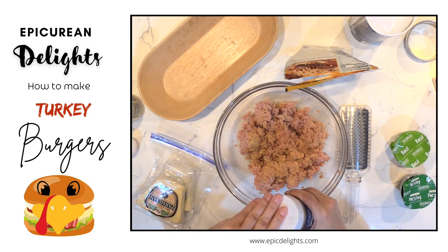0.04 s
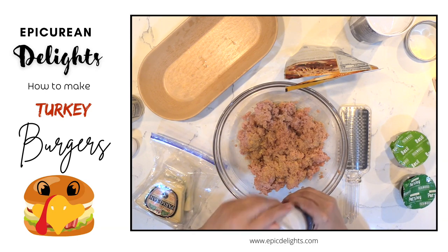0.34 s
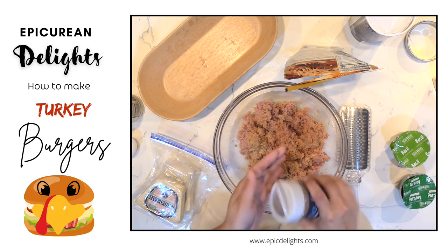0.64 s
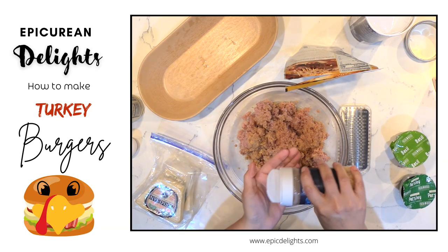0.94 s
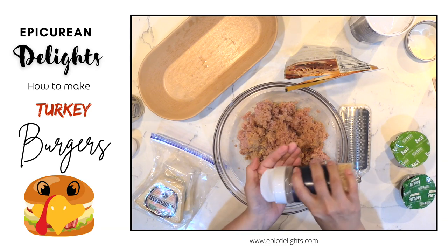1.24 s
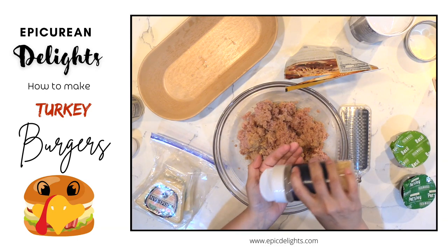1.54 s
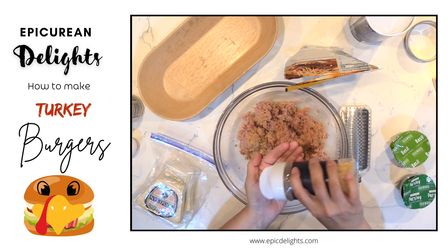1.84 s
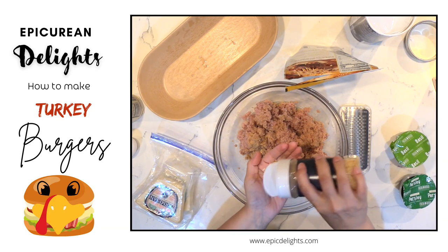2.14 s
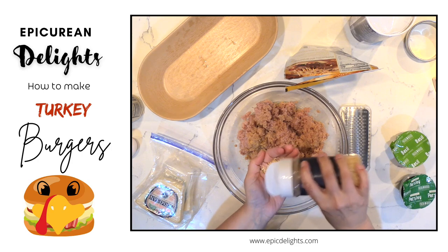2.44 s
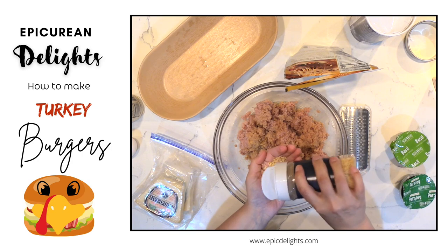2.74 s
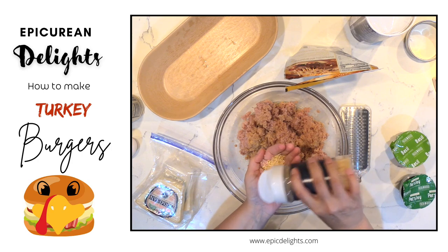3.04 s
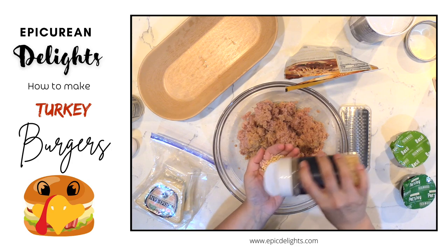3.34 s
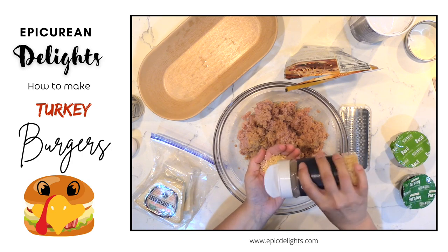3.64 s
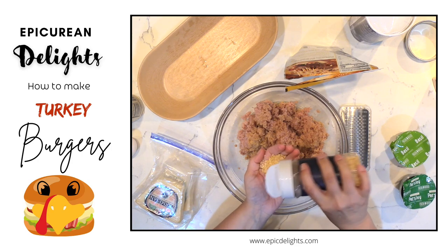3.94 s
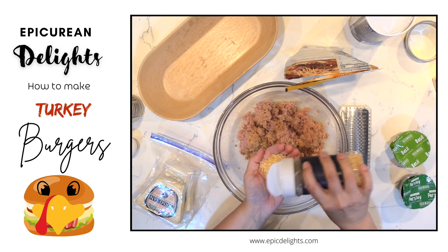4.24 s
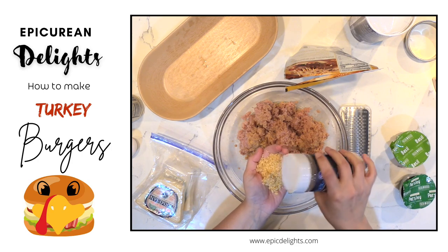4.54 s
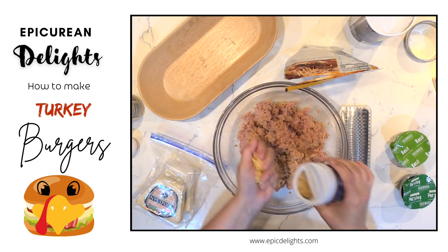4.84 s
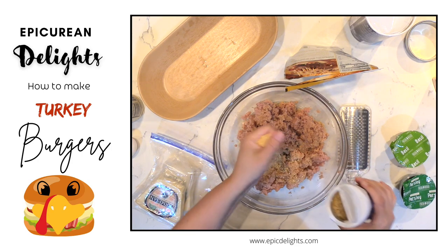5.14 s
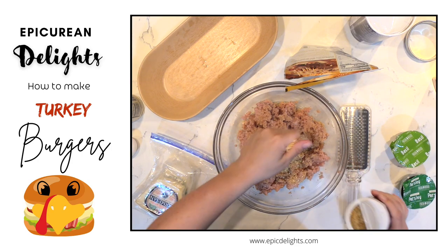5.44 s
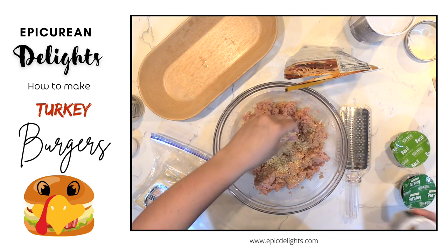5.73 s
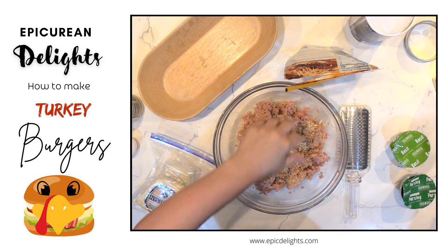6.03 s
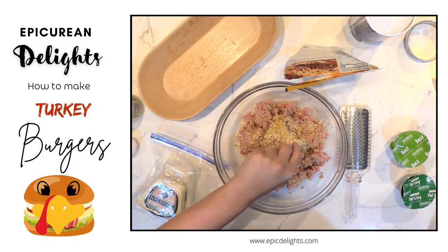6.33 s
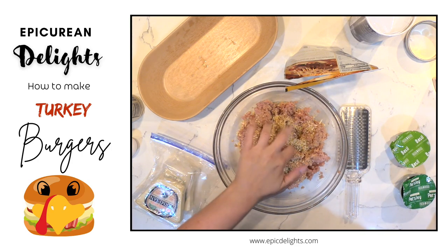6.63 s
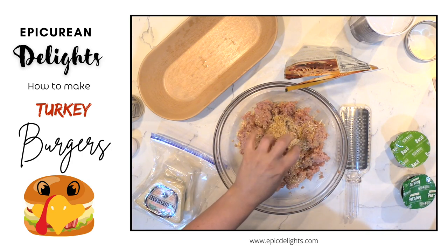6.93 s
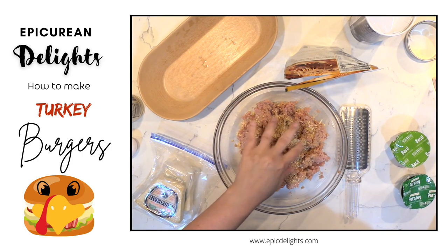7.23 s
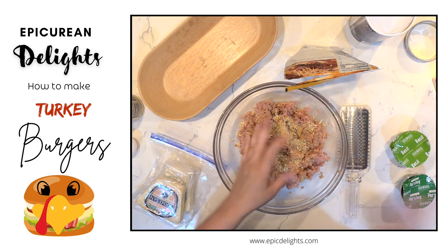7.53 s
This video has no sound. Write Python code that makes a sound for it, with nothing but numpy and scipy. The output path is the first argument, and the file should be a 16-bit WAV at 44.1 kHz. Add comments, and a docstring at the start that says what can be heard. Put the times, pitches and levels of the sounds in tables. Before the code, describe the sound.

A plastic spice jar snaps open, dried flakes rattle out in quick shakes and are sprinkled, then it thuds down and clicks shut.

```python
"""A small kitchen, one microphone close to a mixing bowl. A plastic spice jar is snapped open and dried
onion flakes are shaken into a palm: they slide in the hollow jar and pelt its lid at every shake, then
run back and are sprinkled on the meat. The jar is set down on the counter and clicked shut, and hands
pat and rub. The flakes are swarms of tiny collisions; lid, counter and bowl ring when struck.
A short room tail follows, over a low drone."""
import sys
import numpy as np
from scipy import signal
from scipy.fft import rfft, irfft, next_fast_len
from scipy.io import wavfile
from scipy.ndimage import uniform_filter1d, map_coordinates

SR = 44100
rng = np.random.default_rng(int(sys.argv[2]) if len(sys.argv) > 2 else 0)


def to_wav(sig):
    """Store sig (one row per channel, or 1-D mono) as 16-bit WAV at the path in sys.argv[1].

    Samples outside -1..1 are clipped; the rate is SR.
    """
    pcm = np.clip(np.atleast_2d(sig), -1, 1) * 32767
    pcm = np.round(pcm).astype(np.int16)
    wavfile.write(sys.argv[1], SR, pcm.T)  # frames by channels


N = 343037
TIME = np.arange(N) / SR

# one row a shake: (time the load lands [s], patter [dB], rise [s], back slide [dB], thump [dB],
# clump [dB], pitch of the spot the clump hits [Hz])
SHAKES = [(1.965, -46, 0.018, -50, -49, -31.5, 2680), (2.122, -35.5, 0.024, -51, -38, -36.5, 936),
          (2.253, -33.5, 0.038, -44, -40, -37.5, 1420), (2.554, -31, 0.063, -63, -39.5, -54, 1410),
          (2.75, -34.5, 0.065, -33.5, -38, -33, 2680), (2.902, -33, 0.038, -38.5, -36.5, -32, 1400),
          (3.073, -26.5, 0.025, -40.5, -36.5, -26, 2330), (3.274, -27, 0.041, -33.5, -38, -36.5, 1400),
          (3.49, -34, 0.034, -46, -40.5, -29.5, 2670), (3.672, -28.5, 0.082, -34.5, -36, -31, 1630),
          (3.838, -32.5, 0.056, -39, -38, -34, 1397), (3.997, -31, 0.028, -61, -40.5, -35.5, 1350),
          (4.158, -23, 0.021, -41, -39, -47, 1400)]
# spectra of flakes rubbing, flakes pelting plastic and a hard snap: (frequency [Hz], level [dB])
RASP_COLOUR = [(880, -29.5), (1500, -7.5), (1830, 0), (2410, -2), (2690, 1.5), (3150, -1), (4200, 1.5),
               (5490, 1), (6560, 1.5), (7760, 0), (10900, -9.5), (13400, -14), (16000, -22)]
PELT_COLOUR = [(130, -42), (220, -1), (420, -2), (1110, -7), (1550, 4), (2070, -3.5), (2760, 6), (3130, -1),
               (4090, -1.5), (4640, -4), (5260, -3), (7270, -3), (10600, -16), (13600, -14.5), (16000, -24)]
SNAP_COLOUR = [(70, -37), (140, -28), (250, -13), (400, -2), (570, 0), (760, -10.5), (1080, 5), (1430, 3.5),
               (2300, 7), (3100, 0), (4500, -6.5), (6300, -7.5), (9000, -17.5), (16000, -25)]
# the bowl's resonances: (frequency [Hz], width [Hz], level [dB])
BOWL_MODES = [(492, 49, -3.5), (1050, 48, 6), (2760, 97, 12), (3770, 48, -26)]
# the jar meets the counter: (time [s], level [dB], relative bass [dB], treble [dB], room [dB])
LANDINGS = [(6.401, -12, -6, -11.5, -8), (6.424, -24, -4.5, -7, 3.5), (6.455, -21, 4.5, -8, -10.5),
            (6.476, -24.5, 2, -3, -3.5), (6.813, -32, -8.5, -9.5, -8.5)]


def amp(db):
    """Decibels to gain."""
    return 10 ** (np.asarray(db) / 20)


def unit(x):
    """Scaled to rms 1."""
    return x / np.sqrt(np.mean(x ** 2) + 1e-20)


def crest(x):
    """Scaled so that its loudest 4 ms have rms 1."""
    return x / np.sqrt(uniform_filter1d(x ** 2, size=176).max() + 1e-20)


def along(points, hz):
    """(frequency [Hz], value) points read on a log axis."""
    knots_hz, values = np.transpose(points)
    return np.interp(np.log(hz + 1), np.log(knots_hz + 1), values)


def add(track, s, sound):
    """Mix a sound into the track at time s."""
    part = track[max(round(s * SR), 0):][:len(sound)]
    part += sound[:len(part)]


def curves(rows):
    """A gate that is open while the rows last, then a curve for each column after the time."""
    s, *columns = np.transpose(rows)
    gate = uniform_filter1d(((TIME >= s[0]) & (TIME <= s[-1])) * 1.0, size=600)
    return [gate] + [np.interp(TIME, s, column) for column in columns]


def swells(rows):
    """Gain that grows to a peak and dies away for each (time [s], level [dB], rise [s], fall [s])."""
    power, t = np.zeros(N), np.arange(-SR // 3, SR // 3) / SR
    for s, db, rise_s, fall_s in rows:
        swell = amp(db) * np.exp(-np.abs(t) / np.where(t < 0, rise_s, fall_s))
        add(power, s + t[0], swell ** 2)
    return np.sqrt(power)


def held(start_s, end_s, rise_s, fall_s):
    """Gain of 1 from start to end, with an attack before and a release after."""
    return np.exp(-np.maximum(start_s - TIME, 0) / rise_s - np.maximum(TIME - end_s, 0) / fall_s)


def wobble(rate):
    """A smooth random curve, rate knots a second."""
    return map_coordinates(rng.standard_normal(int(N * rate / SR) + 4), [TIME * rate])


def band(x, edges_hz, kind):
    """Causal low-, band- or high-pass."""
    return signal.sosfilt(signal.butter(3, edges_hz, kind, fs=SR, output="sos"), x)


def coloured(x, db_of_hz):
    """Causal (minimum-phase) filter with a given dB response."""
    size = 2 * next_fast_len(len(x) // 2 + 4096)
    gain = amp(db_of_hz(np.fft.rfftfreq(size, 1 / SR)))
    cepstrum = irfft(np.log(np.maximum(gain, 1e-6)))
    cepstrum[1:size // 2] *= 2
    cepstrum[size // 2 + 1:] = 0
    return irfft(rfft(x, size) * np.exp(rfft(cepstrum)))[:len(x)]


def shaped(x, spectrum):
    """x in the colour of a spectrum, at rms 1."""
    return unit(coloured(x, lambda hz: along(spectrum, hz)))


def grains(rate, spread_db, clump_db):
    """Tiny collisions, rate a second, of scattered sizes that swell in clumps."""
    hits = rng.random(N) < rate / SR
    size = amp(spread_db * np.minimum(rng.exponential(size=N), 4) + clump_db * wobble(160))
    return hits * size * rng.choice([-1, 1], N)


def rustle(colour, fizz_db, rate, spread_db, clump_db):
    """Flakes rub on each other; the finest crumbs add fizz on top."""
    flakes = shaped(grains(rate, spread_db, clump_db), colour)
    return unit(band(flakes, 11000, "low")) + amp(fizz_db - 2) * unit(band(flakes, 11500, "high"))


def strike(colour, modes, contact_s, rise_s, ring_db, band_db, grip_hz=30):
    """A brief contact rings a body; its hardness sets the levels of bass, middle and treble."""
    t = np.arange(SR // 8) / SR
    contact = rng.standard_normal(len(t)) * np.exp(-t / contact_s) * (1 - np.exp(-t / rise_s))
    ring = np.zeros(len(t))
    for hz, width, db in modes:
        strength = amp(db) * rng.standard_normal() * np.sqrt(width)
        decay = np.exp(-np.pi * (width + grip_hz) * t)  # the holding hand widens every mode
        ring += strength * decay * np.cos(2 * np.pi * hz * t)
    body = shaped(contact, colour) + amp(ring_db) * unit(ring)
    parts = band(body, 700, "low"), band(body, [700, 5000], "band"), band(body, 5000, "high")
    return np.pad(sum(amp(db) * crest(part) for db, part in zip(band_db, parts)), (0, SR // 3))


def blows(rows, colour, modes, contact_s, rise_s, ring_db, band_db):
    """A blow radiates differently each way: one path goes straight to the microphone, two by the room."""
    out = np.zeros(N)
    for s, db, bass_db, treble_db, room_db in rows:
        balance_db = np.add(band_db, (bass_db, 0, treble_db))
        direct, left, right = (strike(colour, modes, contact_s, rise_s, ring_db, balance_db)
                               for _ in range(3))
        reflected = (room(left) + room(right)) / np.sqrt(2)
        add(out, s, amp(db) * (direct + amp(room_db) * reflected))
    return out


def room_tone():
    """The kitchen's steady low drone and faint hiss."""
    # spectrum of the quiet room: (frequency [Hz], level [dB])
    air_colour = [(12, -31), (20, -8), (48, -5.5), (123, -5.5), (182, -7), (216, -2), (262, -6),
                  (310, -7.5), (422, -11), (472, -8.5), (574, -14.5), (624, -13), (738, -12), (1220, -15),
                  (16000, -34.5)]
    return amp(-49) * shaped(rng.standard_normal(N), air_colour)


def room(x, build_s=0.00093):
    """The kitchen's answer: a fresh diffuse tail, each frequency dying at its own speed."""
    # reverberation: (frequency [Hz], time to fall 60 dB [s])
    decay_times = [(150, 0.21), (500, 0.31), (1500, 0.29), (4000, 0.36), (9000, 0.31), (15000, 0.069)]
    hz, t, noise = signal.stft(rng.standard_normal(SR // 2), SR, nperseg=256)
    decay = amp(-60 * t / along(decay_times, hz)[:, None])
    tail = signal.istft(noise * decay, SR, nperseg=256)[1]
    tail *= 1 - np.exp(-np.arange(len(tail)) / SR / build_s)
    return signal.fftconvolve(x, tail / np.linalg.norm(tail))[:len(x)]


def hand_pats():
    """Soft, slow contacts of the hand that barely ring the bowl."""
    # pats: (time [s], level [dB], relative bass [dB], treble [dB], room [dB])
    pats = [(5.734, -52, 9, -2, -7), (6.675, -37.5, -2.5, -15.5, 3.5), (6.704, -39, 10, -8, -8),
            (7.278, -39.5, -12, -14, -25), (7.314, -32, -9, -12, -5.5)]
    # spectrum of a soft hand landing: (frequency [Hz], level [dB])
    flesh_colour = [(53, -82), (90, 12.5), (185, 12.5), (370, -19), (683, -19), (1040, -12.5), (2380, -15),
                    (5300, -21.5), (6690, -29.5), (14000, -43)]
    return blows(pats, flesh_colour, BOWL_MODES,
                 contact_s=0.012, rise_s=0.0064, ring_db=-20, band_db=(-3, -8, 1.5))


def palm_rub():
    """Dry crumbs roll between the palms."""
    # palm on palm: (time [s], level [dB])
    strokes = [(7.64, -34), (7.69, -49), (7.73, -35.5), (7.779, -30.5)]
    # spectrum of crumbs on skin: (frequency [Hz], level [dB])
    skin_colour = [(410, -51), (700, -20), (830, -29), (1060, -22), (2130, -7.5), (2430, -11), (4550, -3),
                   (16000, -24)]
    gate, db = curves(strokes)
    crumbs = grains(rate=7000, spread_db=2, clump_db=1)
    return gate * amp(db - 5.5) * shaped(crumbs, skin_colour)


def bowl_tap():
    """A finger taps the bowl and it rings briefly."""
    # tap: (time [s], level [dB], relative bass [dB], treble [dB], room [dB])
    taps = [(7.646, -28.5, -6, -14, -14)]
    return blows(taps, SNAP_COLOUR, BOWL_MODES,
                 contact_s=0.0017, rise_s=0.0001, ring_db=-2, band_db=(2.5, -3.5, 1))


def scrape(width_hz=90):
    """Something thin scrapes: small slips excite a set of high resonances."""
    # slips: (time [s], level [dB])
    slips = [(5.875, -35), (5.945, -31.5)]
    # resonances: (frequency [Hz], level [dB])
    tones = [(5895, -52), (6740, -47), (7445, -50), (8102, -47), (8721, -60), (9012, -48), (10164, -51),
             (11536, -55), (13103, -56)]

    def peaks_db(hz):
        power = sum(amp(db) ** 2 / (1 + (2 * (hz - centre) / width_hz) ** 2) for centre, db in tones)
        return 10 * np.log10(power)

    stroke = swells((s, db, 0.0051, 0.03) for s, db in slips)
    friction = band(grains(rate=6000, spread_db=2, clump_db=1), 5000, "high")
    return stroke * unit(coloured(friction, peaks_db))


def counter_boom(rise_s=0.034):
    """The counter slab swings on after the jar lands."""
    # the slab's low modes: (frequency [Hz], level [dB], time to fall 60 dB [s])
    slab_modes = [(53.3, -27, 1.15), (96, -25, 0.4), (124, -28, 0.54), (152, -31, 0.25)]
    out, t = np.zeros(N), np.arange(SR) / SR
    slab = sum(amp(db - 60 * t / t60) * np.sin(2 * np.pi * hz * t) for hz, db, t60 in slab_modes)
    add(out, LANDINGS[0][0], slab * (1 - np.exp(-t / rise_s)))
    return out


def jar_landing():
    """The jar is set down in a few dull knocks that ring the counter."""
    # spectrum of the contact: (frequency [Hz], level [dB])
    thud_colour = [(41, -29), (70, -18), (142, 3.5), (218, -8.5), (268, -4.5), (336, -14.5), (494, -10.5),
                   (815, -27), (913, -19.5), (1980, -22.5), (2840, -22.5), (3740, -36.5), (8470, -36.5),
                   (13300, -49), (16000, -52)]
    # the counter's resonances: (frequency [Hz], width [Hz], level [dB])
    counter_modes = [(143, 11, -10), (514, 10, -4.5), (1160, 150, 5), (2130, 36, -19), (2500, 27, -15),
                     (2740, 24, -13), (5160, 140, -32), (6200, 170, -33)]
    return blows(LANDINGS, thud_colour, counter_modes,
                 contact_s=0.0061, rise_s=0.00028, ring_db=-9, band_db=(1, -5.5, -0.5))


def lid_opening():
    """The plastic lid is prised open in a run of ringing snaps."""
    # snaps: (time [s], level [dB], relative bass [dB], treble [dB], room [dB])
    snaps = [(0.037, -31, -12, 1, -2), (0.048, -13, -11, -9, 4.5), (0.051, -2.5, -21, -12, -4),
             (0.074, -14, -14.5, -19, 4), (0.228, -19, -6.5, -12.5, -8), (0.38, -9.5, -15, -7.5, -12)]
    # the open lid's resonances: (frequency [Hz], width [Hz], level [dB])
    lid_modes = [(376, 24, -16), (585, 26, 1), (1087, 12, 6), (1464, 58, 14), (2340, 24, -17),
                 (3480, 24, -1), (4380, 150, 6), (6030, 48, 2), (6450, 49, 2), (7500, 80, -10)]
    return blows(snaps, SNAP_COLOUR, lid_modes,
                 contact_s=0.004, rise_s=0.0001, ring_db=-9.5, band_db=(0, -6.5, -2.5))


def lid_closing():
    """The lid clicks shut: two hard contacts, almost at once."""
    # clicks: (time [s], level [dB], relative bass [dB], treble [dB], room [dB])
    clicks = [(6.928, -13.5, -14, -1.5, -5.5), (6.931, -15.5, -21.5, -17, -1)]
    # spectrum of the contact: (frequency [Hz], level [dB])
    click_colour = [(70, -34), (130, -17.5), (270, -2.5), (400, -20), (510, -0.5), (800, -27), (1300, 1),
                    (2300, 5.5), (3200, 1), (4300, -2), (5300, -8.5), (6600, -7), (8500, -16), (16000, -25)]
    # the shut lid's resonances: (frequency [Hz], width [Hz], level [dB])
    lid_modes = [(269, 40, -3), (2480, 25, -16), (2470, 21, -20), (3600, 48, -17), (3700, 88, -21),
                 (4340, 140, 6), (4470, 39, 5), (6480, 27, 11), (7400, 100, 0), (7800, 44, -15)]
    return blows(clicks, click_colour, lid_modes,
                 contact_s=0.0016, rise_s=0.00047, ring_db=-11, band_db=(0.5, -1, 3))


def flake_cracks(strays_per_s=16, scatter_db=3, stray_hz=9000, snap_s=0.0008):
    """Single brittle flakes crack, each around its own pitch: a few loud ones among faint strays."""
    # the loudest cracks: (time [s], level [dB], centre [Hz])
    loud_cracks = [(0.634, -29.5, 6000), (0.667, -26, 6300), (0.718, -32, 5700), (1.024, -34, 7300),
                   (1.278, -29, 7000), (1.519, -31, 4850), (1.627, -33, 5900), (4.296, -34, 7000),
                   (4.375, -30.5, 6000), (5.556, -36, 10000), (5.875, -32, 7800), (6.082, -27, 7150),
                   (6.115, -27, 6500), (6.168, -29, 8500), (6.239, -25.5, 8700), (6.563, -36, 9000),
                   (7.058, -33, 9000), (7.253, -42, 8500)]
    # stray cracks while jar and hand move: (start [s], end [s], typical level [dB])
    stray_spans = [(0.449, 1.701, -43), (5.5, 6.301, -48), (6.504, 7.147, -43)]
    out, t = np.zeros(N), np.arange(SR // 30) / SR
    cracks = list(loud_cracks)
    for start_s, end_s, db in stray_spans:
        span_s = end_s - start_s
        for when, size, pitch in rng.random((round(span_s * strays_per_s), 3)):
            stray_db = db + scatter_db * (2 * size - 1)
            cracks.append((start_s + when * span_s, stray_db, stray_hz * 2 ** (pitch - 0.5)))
    for s, db, centre_hz in cracks:
        snap = rng.standard_normal(len(t)) * np.exp(-t / snap_s)
        crack = coloured(snap, lambda hz: -6 * np.log2((hz + 1) / centre_hz) ** 2)
        add(out, s, amp(db) * crest(crack))
    return band(out, 13000, "low")


def sprinkling():
    """The hand crumbles the flakes over the bowl, pinch by pinch over a thin trickle."""
    # the fingers let go: (time [s], rise and fall [s], level [dB], relative fizz [dB])
    pinches = [(5.686, 0.015, -32, -11), (5.93, 0.053, -38, -8), (6.056, 0.02, -34.5, 1),
               (6.126, 0.1, -37.5, -16), (6.19, 0.026, -32, -16)]
    # spectrum of flakes in the palm: (frequency [Hz], level [dB])
    palm_colour = [(1180, -24), (2000, -11.5), (2610, -10.5), (3290, -6), (3550, -8.5), (4290, -5.5),
                   (5130, -6), (6810, -1), (8730, -0.5), (10500, -7), (15500, -8)]
    trickle = amp(-46.5) * held(start_s=5.6, end_s=6.25, rise_s=0.011, fall_s=0.026)
    pinch_flow = swells((s, db, half_s, half_s) for s, half_s, db, _ in pinches)
    pinch_fizz = swells((s, db + fine_db, half_s, half_s) for s, half_s, db, fine_db in pinches)
    flow = np.hypot(trickle, pinch_flow)
    fizz = np.hypot(amp(-2) * trickle, pinch_fizz)
    fizz_db = 20 * np.log10((fizz + 1e-9) / (flow + 1e-9))
    return amp(-1) * flow * rustle(palm_colour, fizz_db, rate=5000, spread_db=3, clump_db=1.5)


def settling():
    """Flakes run back down the jar with a thin, even hiss; the last to move are the finest."""
    # flow as the jar is tipped upright: (time [s], level [dB])
    run_back = [(4.6, -65), (4.816, -40), (4.938, -36), (5.066, -38), (5.186, -49), (5.388, -47.5),
                (5.6, -51.5)]
    gate, db = curves(run_back)
    fizz_db = -8 + 0.29 * (db.max() - db)  # the weaker the flow, the greater the share of fizz
    hiss = band(rustle(RASP_COLOUR, fizz_db, rate=7000, spread_db=2, clump_db=1), 2200, "high")
    return gate * amp(db + 1.26) * hiss


def hollow_jar(x):
    """Sound inside the jar is lifted around its treble resonance."""
    # resonances: (frequency [Hz], width [Hz], boost [dB])
    jar_modes = [(410, 140, 0), (2730, 53, 0), (6670, 2200, 2.5)]
    return coloured(x, lambda hz: sum(db / (1 + (2 * (hz - centre) / width) ** 2)
                                      for centre, width, db in jar_modes))


def sliding(back_share=0.562):
    """Flakes slide as the jar tips, then to and fro at every shake."""
    # flow as the jar is tipped over: (time [s], level [dB])
    tipping_flow = [(0.45, -46.5), (0.658, -44.5), (0.664, -40), (0.834, -32.5), (0.964, -50.5),
                    (1.096, -55.5), (1.146, -44), (1.19, -52), (1.278, -34.5), (1.376, -55), (1.442, -36.5),
                    (1.486, -47.5), (1.634, -41.5), (1.668, -49), (1.744, -32), (1.842, -41.5), (1.93, -26),
                    (2.002, -36), (2.27, -44.5), (2.42, -66)]
    # the jar's lean: (time [s], tilt [0 upright to 1 mouth down])
    lean = [(0.85, 0.36), (1.45, 0.68), (1.95, 0.73), (2.4, 1)]
    # spectrum of the jar's wall: (frequency [Hz], level [dB])
    wall_colour = [(150, -47), (260, -9), (368, 4.5), (614, -10), (761, -21), (934, 4), (1210, -7.5),
                   (1320, -6), (2300, -3), (2710, -16.5), (3000, -1.5), (3900, -77), (6600, -120)]
    gate, flow_db = curves(tipping_flow)
    tipping = gate * amp(flow_db + 1.5)
    # the load slides back a share of a stroke before it lands
    back = swells((s - back_share * (s - before[0]), db, 0.022, 0.03)
                  for before, (s, _, _, db, *_) in zip(SHAKES, SHAKES[1:]))
    forward = swells((s, db - 5.5, rise_s, 0.025) for s, db, rise_s, *_ in SHAKES)
    # loose flakes never rest while the jar is shaken
    stir = amp(-42.5) * held(start_s=2.47, end_s=4.244, rise_s=0.023, fall_s=0.15)
    flow = np.sqrt(tipping ** 2 + back ** 2 + forward ** 2 + stir ** 2) * amp(wobble(35))
    # mouth down, the flakes fizz less and drum more on the wall
    tilt = curves(lean)[1]
    fizz_db = np.interp(tilt, [0, 1], [0, -9.5])
    wall_db = np.interp(tilt, [0, 1], [-33.5, -13])
    rasp = amp(-2.5) * rustle(RASP_COLOUR, fizz_db, rate=7000, spread_db=2, clump_db=1.5)
    drumming = shaped(grains(rate=1500, spread_db=3, clump_db=2.5), wall_colour)
    return flow * (rasp + amp(wall_db) * drumming)


def clump_knocks(contact_s=0.003, ring_s=0.004, tail_s=0.012, spot_width_hz=200):
    """At each shake a clump strikes the jar; the spot rings, kept going by the flakes around it."""
    out, t = np.zeros(N), np.arange(SR // 10) / SR
    for s, *_, db, spot_hz in SHAKES:
        burst = shaped(rng.standard_normal(len(t)) * np.exp(-t / contact_s), PELT_COLOUR)
        contact = band(band(burst, 4500, "low"), 600, "high")
        tone = np.sin(2 * np.pi * spot_hz * t)
        ring = np.exp(-t / ring_s) * tone
        add(out, s, amp(db) * (crest(contact) + amp(-3) * crest(ring)))
        loose_flakes = rng.standard_normal(len(t)) * np.exp(-np.abs(t - t.mean()) / tail_s)
        spot = np.exp(-np.pi * spot_width_hz * t) * tone
        add(out, s - t.mean(), amp(db - 10) * crest(signal.fftconvolve(loose_flakes, spot)))
    return out


def pelting(fall_s=0.014, thump_lead_s=0.015):
    """Each stroke ends with the load pelting the lid: collisions swell and stop, over a hollow thump."""
    patter_gain = swells((s, db - 5.5, rise_s, fall_s) for s, db, rise_s, *_ in SHAKES)
    thump_gain = swells((s - thump_lead_s, db - 6, 0.033, 0.027) for s, _, _, _, db, *_ in SHAKES)
    flakes = shaped(grains(rate=4000, spread_db=2.5, clump_db=-2.5), PELT_COLOUR)
    patter = unit(band(flakes, 1400, "high"))
    thump = unit(band(flakes, [290, 700], "band"))
    return patter_gain * patter + thump_gain * thump


def scene():
    """Flakes, jar and hands close to the microphone, the kitchen behind them."""
    in_jar = hollow_jar(sliding() + pelting() + clump_knocks())
    flakes = in_jar + settling() + sprinkling() + palm_rub() + flake_cracks() + scrape()
    handling = lid_opening() + lid_closing() + jar_landing() + hand_pats() + bowl_tap()
    return (flakes + amp(-10.5) * room(flakes) + handling + counter_boom() + room_tone())[None]


def record(dry, ceiling=0.7, top_hz=15950):
    """The recorder rounds off the loudest peaks and keeps nothing above its band limit."""
    rounded = dry / (1 + np.abs(dry / ceiling) ** 6) ** (1 / 6)
    size = next_fast_len(N + SR // 2)
    passband = np.fft.rfftfreq(size, 1 / SR) < top_hz
    return irfft(rfft(rounded, size) * passband, size)[..., :N]


dry = scene()
out = record(dry)
to_wav(out)
```